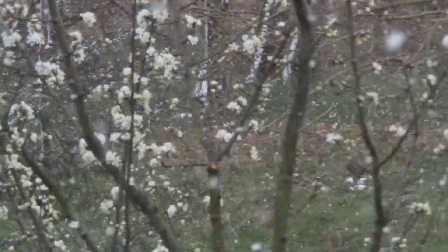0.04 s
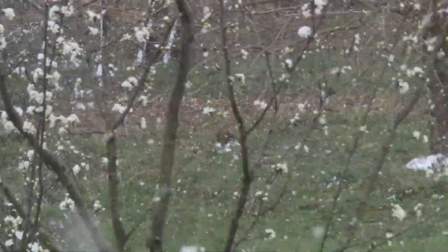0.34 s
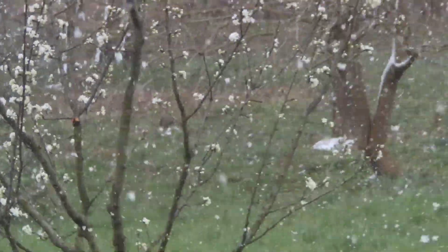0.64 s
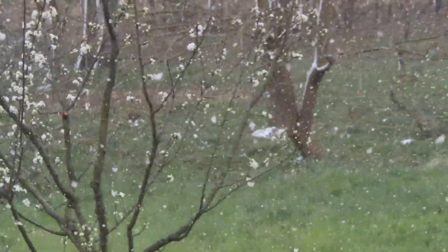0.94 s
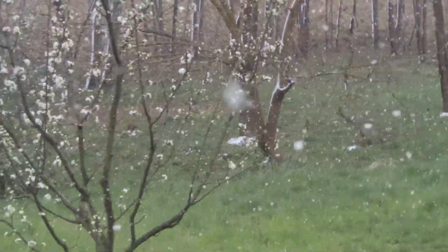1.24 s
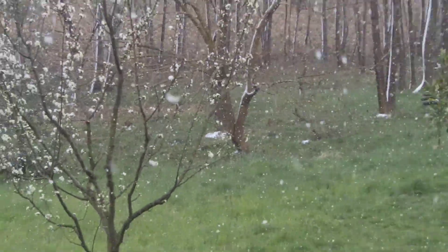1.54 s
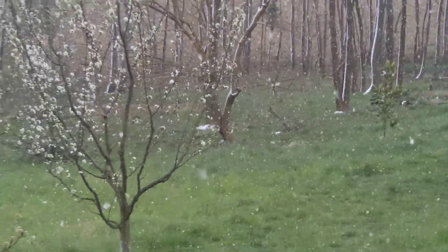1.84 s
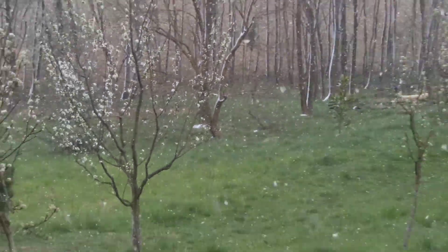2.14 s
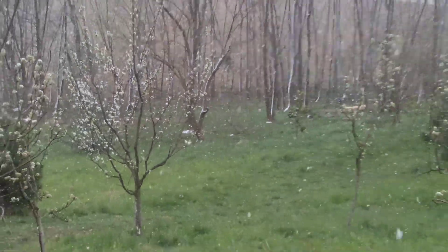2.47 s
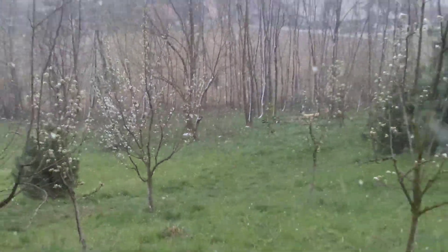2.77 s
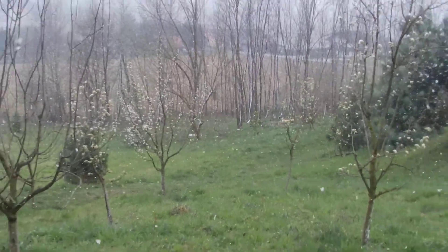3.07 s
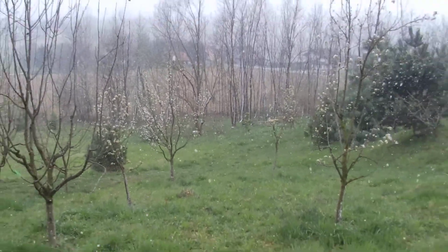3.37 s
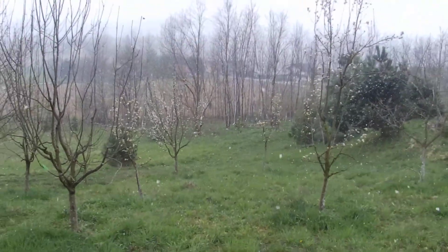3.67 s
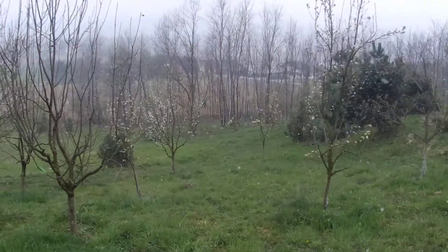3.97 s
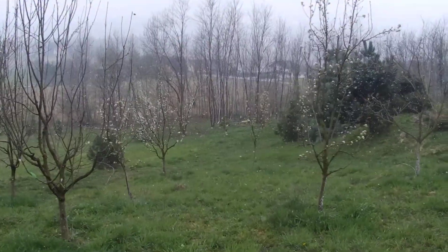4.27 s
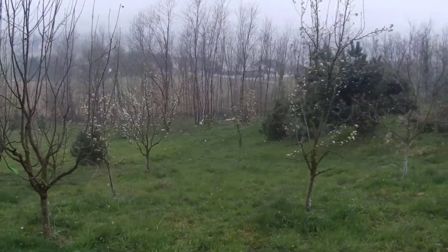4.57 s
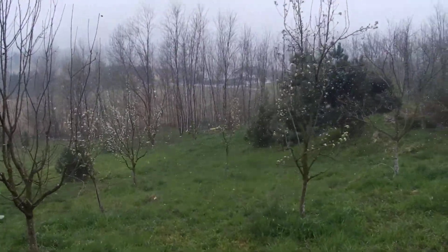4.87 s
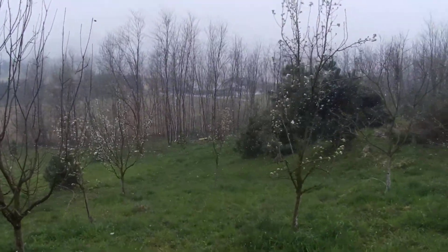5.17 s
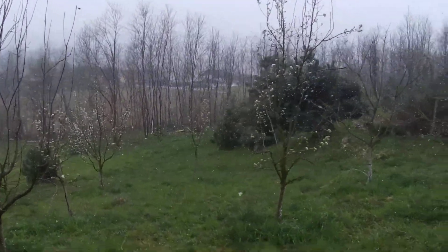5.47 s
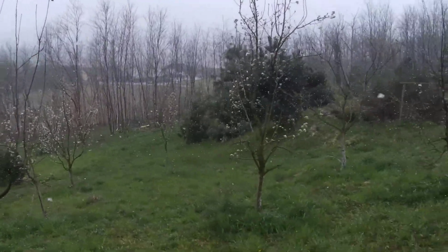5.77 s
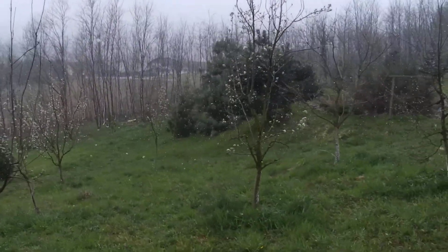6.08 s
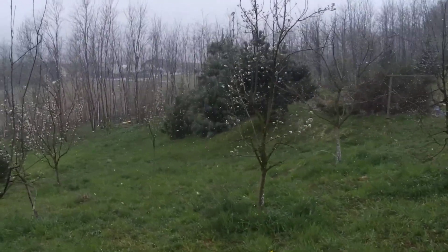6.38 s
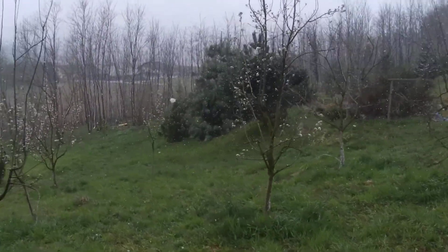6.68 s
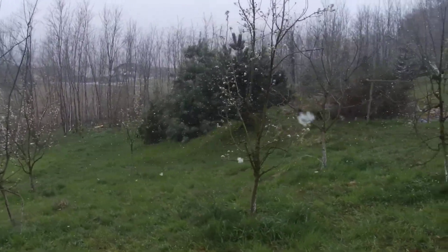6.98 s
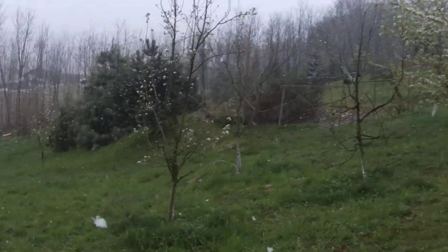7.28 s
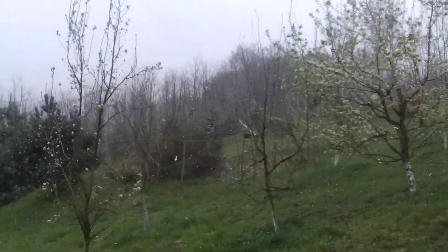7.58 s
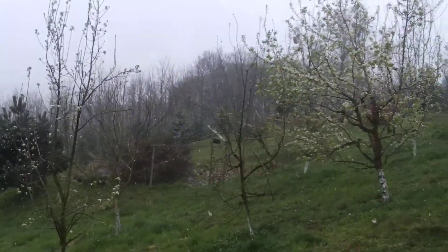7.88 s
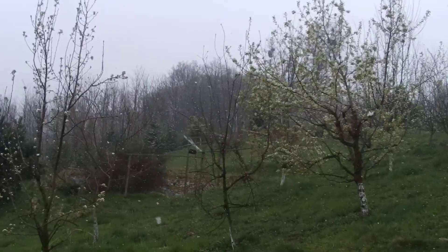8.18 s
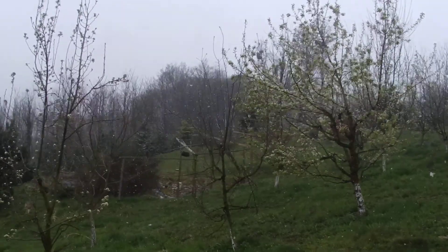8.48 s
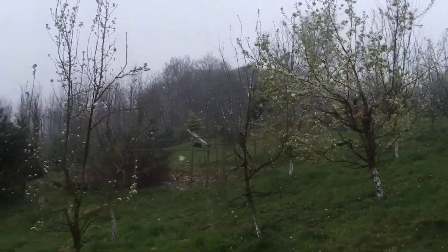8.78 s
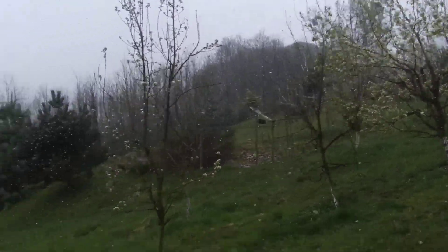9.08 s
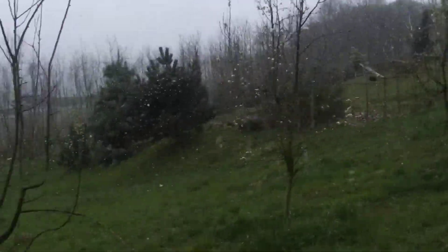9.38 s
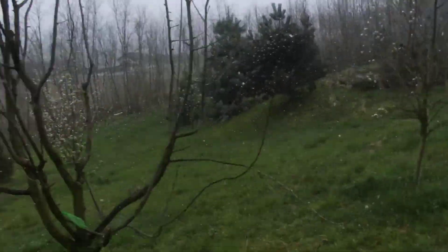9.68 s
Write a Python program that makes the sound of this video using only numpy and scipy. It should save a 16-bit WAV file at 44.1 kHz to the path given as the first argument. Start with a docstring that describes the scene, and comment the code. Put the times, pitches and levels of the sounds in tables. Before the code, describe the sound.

Faint distant air, a low wind rumble and a thin electronic hiss run throughout, heard through a hand-held camera's microphone in an orchard. From the start, the zoom motor whirs quietly with a fine gear rattle and a thin high whine. Small sharp lens ticks cluster between about 1.3 and 2.8 seconds, while fingers softly rub and bump the housing. At about 3.8 seconds the zoom stops, the hiss comes up and a gust buffets the microphone with low, irregular thumping puffs, by far the loudest sound. It dies down at around 5.2 seconds, leaving a weak rumble. From about 4 seconds to the end, sleeves rustle faintly and the plastic housing gives scattered light clicks. A soft, dull finger knock comes near 7.7 seconds, and several more between 8.6 and 9.4 seconds.

```python
"""A hand-held camera in an orchard on a raw spring day. Far air, a low wind rumble and a faint electronic
hiss are there from the start. For 3.8 seconds the zoom motor whirs and the lens ticks, while fingers rub
and knock on the housing. As the zoom ends, the hiss comes up, sleeves start to rustle and a gust buffets
the microphone. The gust dies down after about 5 seconds, leaving the sleeves rustling and the housing
clicking under the fingers as the camera pans."""
import sys
import numpy as np
from scipy import signal
from scipy.fft import rfft, irfft, next_fast_len
from scipy.io import wavfile
from scipy.ndimage import uniform_filter1d

SR = 44100
rng = np.random.default_rng(int(sys.argv[2]) if len(sys.argv) > 2 else 0)


def dump_mix(stems):
    """Bounce the given channels to the path in sys.argv[1] as a 16-bit WAV at rate SR."""
    frames = np.atleast_2d(stems).T  # one column per channel
    limited = np.clip(frames, -1, 1)  # hard clip at full scale
    pcm = np.round(limited * 32767).astype(np.int16)
    wavfile.write(sys.argv[1], SR, pcm)


N = 428652
TIME = np.arange(N) / SR
ZOOM_END_S = 3.8

# Levels in the tables are relative: the functions turn each layer up or down as a whole.
# The tone of far air, microphone hiss and wind rumble. Each row: frequency in Hz, level in dB.
AIR_TONE = [(60, -2), (130, 0.5), (250, -0.5), (450, -2), (650, -6), (1000, -9), (1500, -12), (2000, -21.5),
            (2600, -19), (4000, -34), (6000, -27.5), (8000, -56)]
HISS_TONE = [(2000, 2), (5500, -2.5), (7000, -10), (8300, -12), (10000, -7), (12000, -2.5), (14000, 0),
             (15800, -5)]
RUMBLE_TONE = [(12, -8), (25, -7.5), (48, 0.5), (80, -1.5), (130, -7.5), (220, -18), (400, -30), (900, -84)]
# How hard the wind presses on the microphone. Each row: time in seconds, level in dB.
WIND_STRENGTH = [(0, -51.5), (1.5, -53), (2.4, -51.5), (2.9, -43), (3.2, -46), (3.6, -44), (3.92, -32),
                 (4.88, -29.5), (5.3, -49), (5.65, -44.5), (5.85, -50), (6.7, -48), (8.4, -52.5),
                 (9.25, -48), (9.5, -42.5), (9.72, -48)]
# How hard the zoom drive works. Each row: time in seconds, level in dB.
ZOOM_LOAD = [(0, -57.5), (.9, -57), (1.22, -54.5), (1.5, -58.5), (2.62, -56), (2.77, -53), (2.92, -60),
             (3.8, -59)]
# Where the gear housing and the lens barrel ring. Each row: pitch in Hz, base width in Hz, level in dB.
GEAR_RINGS = [(254, 41, 4.5), (437, 98, 1.5), (678, 170, -3), (942, 143, 4.5), (1127, 76, -0.5),
              (1390, 130, -7.5), (1575, 50, -4)]
BARREL_RINGS = [(2770, 290, -0.5), (3375, 250, 1.5), (3790, 570, -4), (4420, 490, -4), (5200, 680, -9.5)]
# A thin high whine near 12 kHz, with two fainter bands of hiss below it during the zoom.
# Each row: pitch in Hz, width in Hz, level in dB.
WHINE_AND_HISS_BANDS = [(9400, 620, -91), (11030, 450, -86), (12040, 480, -76)]
# Sharp ticks of the lens. Each row: time in seconds, tick level in dB, barrel ring level in dB.
LENS_CATCHES = [(0.19, -53, -55), (0.2059, -49, -45), (0.655, -52, -40), (1.17, -59, -39.5),
                (1.3349, -47, -59), (1.3668, -52, -62), (1.627, -39, -58), (1.7472, -46.5, -60),
                (1.8446, -45, -57), (1.915, -38.5, -54), (1.9774, -46, -50), (2.0068, -45, -57),
                (2.271, -63, -43), (2.301, -48, -57), (2.384, -36, -51), (2.394, -42, -51),
                (2.4314, -45, -61), (2.7835, -50, -56), (2.8205, -37, -54)]
# The tone of a lens tick. Each row: frequency in Hz, level in dB.
TICK_TONE = [(1500, -22), (3500, -1), (5500, -3.5), (8000, -22), (9500, -8), (11000, -6), (12200, 2),
             (14000, 4), (15800, -1)]
# Soft rubs of the hand. Each row: middle in seconds, length in seconds, level in dB, pitch in Hz.
HAND_RUBS = [(.2, 0.52, -56, 392), (0.67, 0.15, -51.5, 180), (0.907, 0.16, -52.5, 188),
             (1.2, 0.19, -51.5, 120), (2.396, 0.015, -44, 262), (3.255, .15, -53, 263),
             (3.454, 0.15, -48, 128), (6.18, 0.068, -51.5, 165), (6.864, 0.15, -55, 190),
             (6.847, 0.56, -59, 1050), (7.513, 0.13, -53, 443), (8.044, 0.29, -57.5, 450),
             (9.197, 0.54, -59, 424), (9.558, 0.2, -56, 272)]
# Dull knocks of the fingers. Each row: time in seconds, level in dB.
FINGER_KNOCKS = [(2.384, -50), (2.78, -42), (7.723, -46.5), (8.627, -44), (9.098, -43.5), (9.231, -44.5),
                 (9.365, -39)]
# The tone of a knock. Each row: frequency in Hz, level in dB.
KNOCK_TONE = [(100, 7), (400, 27), (1500, 13), (6000, -11), (12000, -11)]
# Strokes of the sleeve. Each row: start in seconds, length in seconds, level in dB.
SLEEVE_STROKES = [(3.8, .17, -62), (4.42, 0.19, -60), (4.86, 0.085, -54.5), (5.8, 0.34, -64.5),
                  (6.62, 0.041, -56.5), (6.78, 0.34, -63), (7.42, 0.13, -57.5), (7.8, 0.046, -58),
                  (8.02, 0.14, -58.5), (8.95, .13, -59.5), (9.46, 0.24, -58)]
# Crisp crumples of the fabric. Each row: middle in seconds, length in seconds, level in dB.
SLEEVE_CRUMPLES = [(3.88, 0.071, -60.5), (3.984, 0.059, -59.5), (4.756, 0.14, -60.5), (4.902, 0.068, -53),
                   (5.07, 0.039, -57.5), (5.806, 0.08, -55), (5.957, 0.06, -53), (6.618, 0.019, -63),
                   (6.673, 0.025, -56), (8.987, 0.13, -59), (9.365, 0.044, -59.5)]
# The tone of sliding and of crumpling cloth. Each row: frequency in Hz, level in dB.
CLOTH_TONE = [(700, 0.5), (1800, -7), (2550, 1), (3400, -0.5), (4400, -2.5), (5700, -7.5), (7000, -15),
              (8300, -19.5), (11000, -14), (14000, -26)]
CRUMPLE_TONE = [(1200, -11), (2500, -9), (3600, 3), (4500, 4.5), (5700, -2), (7000, -26), (8300, -21),
                (11000, -7.5), (14000, -19)]
# The puffs of the gust. Each row: start in seconds, length in seconds, level in dB.
GUST_PUFFS = [(3.8, 0.082, -36), (3.872, 0.056, -25), (3.968, 0.058, -24.5), (4.152, 0.051, -25.5),
              (4.255, 0.068, -25.5), (4.415, 0.16, -33.5), (4.62, 0.049, -23.5), (4.735, 0.17, -22),
              (5.003, 0.013, -28), (5.112, .01, -25.5), (5.182, 0.032, -27.5), (5.58, .125, -43)]
# Single strong swirls of air. Each row: time in seconds, level in dB, pitch in Hz.
BIG_SWIRLS = [(3.896, -13, 121), (3.915, -19, 250), (3.968, -12.5, 163), (3.997, -10, 230),
              (4.015, -22, 118), (4.158, -14, 193), (4.206, -10.5, 162), (4.245, -15.5, 119),
              (4.282, -17, 124), (4.346, -22.5, 204), (4.415, -11.5, 162), (4.43, -11.5, 149),
              (4.512, -9, 153), (4.621, -11, 217), (4.655, -15, 161), (4.795, -13, 123),
              (4.835, -14.5, 120), (4.909, -17, 137), (5.116, -17, 169), (5.185, -21.5, 142),
              (5.694, -26, 173), (6.551, -28.5, 143), (8.997, -34.5, 162)]
# Clicks of the housing. Each row: time in seconds, level in dB, pitch in Hz, shell ring level in dB.
HOUSING_CLICKS = [(4.087, -45, 3640, -69), (4.6448, -47, 5200, -61), (4.864, -32.5, 3770, -59),
                  (4.9504, -50, 3970, -63), (5.004, -42, 4200, -65), (5.2165, -45.5, 4040, -57),
                  (5.775, -46, 4200, -60), (5.839, -41, 4630, -62), (5.9202, -41, 3940, -61),
                  (6.027, -38, 4130, -64), (6.423, -43, 3300, -62), (6.6118, -40, 4330, -50),
                  (6.666, -50, 4640, -65), (6.752, -47, 3880, -56), (7.3974, -36.5, 4800, -55),
                  (7.4393, -43, 4050, -55), (7.665, -47, 2900, -65), (8.1554, -52, 3160, -65),
                  (8.6273, -47, 3260, -55), (9.0987, -42, 3140, -44), (9.1357, -56, 2920, -49),
                  (9.2274, -48, 3860, -64), (9.362, -55, 4600, -56), (9.509, -52, 4370, -50.5),
                  (9.648, -45, 4700, -53)]


def from_db(db):
    """Turn decibels into a number to multiply by."""
    return 10 ** (np.asarray(db) / 20)


def rms_one(x):
    """Scale a sound so that its average strength (rms) is 1."""
    return x / np.sqrt(np.mean(x ** 2) + 1e-20)


def in_time(rows):
    """Join (time, value) rows with straight lines."""
    return np.interp(TIME, *np.transpose(rows))


def drift(per_s):
    """A random wander, about 1 in size, that heads for a new value per_s times a second."""
    points = rng.standard_normal(4096)
    return np.interp(TIME * per_s, np.arange(len(points)), points) * np.sqrt(3 / 2)


def held(start_s, length_s, rise_s, fall_s):
    """A loudness curve that rises to 1 at start_s, holds and dies away."""
    early = np.maximum(start_s - TIME, 0)
    late = np.maximum(TIME - start_s - length_s, 0)
    return np.exp(-np.minimum(early / rise_s + late / fall_s, 20))


def bursts(rows, rise_s, fall_s):
    """One loudness curve from (start, length, level) rows, adding their power."""
    return np.sqrt(sum((from_db(db) * held(s, length, rise_s, fall_s)) ** 2 for s, length, db in rows))


def evened(x, seconds):
    """Keep the fast grain of a sound but hold its slow level at 1."""
    size = int(seconds * SR)
    power = uniform_filter1d(uniform_filter1d(x * x, size), size)
    return x / np.sqrt(np.abs(power) + 1e-12)


def coloured(x, tone):
    """Filter a sound so that it follows a tone table."""
    size = next_fast_len(N + SR // 4, real=True)
    hz, db = np.transpose(tone)
    grid_hz = np.maximum(np.fft.rfftfreq(size, 1 / SR), 1)
    gain = from_db(np.interp(np.log(grid_hz), np.log(hz), db))
    cepstrum = irfft(np.log(gain), size)
    # Fold it onto its first half, so the filter rings only after a hit (minimum phase).
    cepstrum[1:size // 2] *= 2
    cepstrum[size // 2 + 1:] = 0
    return irfft(rfft(x, size) * np.exp(rfft(cepstrum)), size)[:N]


def low_pass(x, hz):
    """Take away the treble above hz."""
    return signal.sosfilt(signal.butter(4, hz, fs=SR, output="sos"), x)


def resonate(x, hz, width_hz):
    """Let a sound ring at one pitch, which passes at full strength."""
    r = np.exp(-np.pi * width_hz / SR)
    feedback = [1, -2 * r * np.cos(2 * np.pi * hz / SR), r * r]
    return signal.lfilter(np.array([1, 0, -1]) * (1 - r * r) / 2, feedback, x + 1e-18)


def narrow(x, hz, width_hz):
    """Ring twice over, so that little is left away from the pitch."""
    return resonate(resonate(x, hz, width_hz), hz, width_hz)


def noise(tone):
    """Smooth noise with the given tone, at strength 1."""
    return rms_one(coloured(rng.standard_normal(N), tone))


def grains(per_s, spread_db):
    """Tiny random taps of uneven size, at strength 1."""
    chance, out = rng.random(N), np.zeros(N)
    taps = np.flatnonzero(chance < per_s / SR)
    rarity = np.minimum(-np.log(chance[taps] * SR / per_s + 1e-12), 4)   # big taps are rare
    out[taps] = from_db(spread_db * rarity) * (-1) ** taps
    return rms_one(out)


def rattle(rings, per_s, spread_db):
    """A rattling part: each of its pitches is set ringing by its own stream of tiny taps."""
    return rms_one(sum(from_db(db) * narrow(grains(per_s, spread_db), hz, 1.8 * width)
                       for hz, width, db in rings))


def add(out, s, sound):
    """Mix a short sound in at s seconds."""
    start = int(np.clip(s * SR, 0, N - 1))
    out[start:start + len(sound)] += sound[:N - start]


def swell(sound, middle_s, length_s, db):
    """Fade a sound in and out along a bell shape."""
    distance = (TIME - middle_s) / length_s
    return from_db(db) * np.exp(-2 * distance ** 2) * (np.abs(distance) < 2) * sound


def snap(decay_s, tail_db, tail_s):
    """Two things touch: a very short burst of noise with a longer tail."""
    t = TIME[:SR // 25]
    envelope = np.exp(-t / decay_s) + from_db(tail_db) * np.exp(-t / tail_s)
    return rng.standard_normal(len(t)) * envelope


def strikes(rows, decay_s, tail_db, tail_s):
    """One snap for each (time, level) row."""
    out = np.zeros(N)
    for s, db in rows:
        contact = snap(decay_s, tail_db, tail_s)
        add(out, s, from_db(db) * contact / np.abs(contact).max())
    return out


def air_and_hiss(air_db=-51.5, hiss_db=-62.5, return_s=0.27):
    """Far air over fields and trees, and the microphone's own hiss; both come up as the zoom ends."""
    zooming = np.clip((ZOOM_END_S - TIME) / return_s, 0, 1)
    dip = held(start_s=3, length_s=0.62, rise_s=0.12, fall_s=0.12)   # the air goes briefly quieter
    air = from_db(air_db - 2 * zooming - 12.5 * dip) * noise(AIR_TONE)
    hiss = from_db(hiss_db - 13.5 * zooming) * noise(HISS_TONE)
    return air + hiss


def wind_rumble(gain_db=-1, waver_db=1.5):
    """Slow swings of wind pressure push on the microphone all along."""
    level_db = in_time(WIND_STRENGTH) + gain_db + waver_db * drift(per_s=7)
    return from_db(level_db) * evened(noise(RUMBLE_TONE), seconds=0.21)


def zoom_motor(white, hold_s=0.73, fade_db_per_s=3.5):
    """The motor thrums low and sings a thin note that holds, then fades."""
    thrum = from_db(-53) * rms_one(narrow(white, hz=40.9, width_hz=21))
    singing_db = -66.5 - fade_db_per_s * np.maximum(TIME - hold_s, 0)
    return thrum + from_db(singing_db) * rms_one(narrow(white, hz=3706, width_hz=440))


def high_whine(white):
    """A thin high whine near 12 kHz, with two fainter bands of hiss below it."""
    return sum(from_db(db) * rms_one(narrow(white, hz, width)) for hz, width, db in WHINE_AND_HISS_BANDS)


def zoom_drive(travel_s=1.41, travel_length_s=1.57):
    """While the motor runs, gear teeth rattle the housing and the barrel slides and ticks."""
    load_db = in_time(ZOOM_LOAD)
    # A second lens group travels for part of the zoom, adding to the scraping and ticking.
    travel = held(travel_s, travel_length_s, rise_s=0.06, fall_s=0.06)
    arrived = (1 - travel) * (TIME > travel_s + travel_length_s)
    slide_db = load_db - 11 + 2.5 * travel - arrived
    ticking_db = load_db - 13.5 + 5 * travel
    gears = from_db(load_db + 4) * rattle(GEAR_RINGS, per_s=3000, spread_db=2)
    barrel = from_db(slide_db + 1.2 * drift(40)) * rattle(BARREL_RINGS, per_s=2200, spread_db=6.5)
    taps = grains(per_s=6000, spread_db=5.5) * from_db(1.9 * drift(70))
    ticking = from_db(ticking_db) * rms_one(coloured(taps, TICK_TONE))
    white = rng.standard_normal(N)
    running = np.clip((ZOOM_END_S - TIME) / 0.024 + 1, 0, 1)
    return running * (gears + barrel + ticking + zoom_motor(white) + high_whine(white))


def lens_ticks(tick_gain_db=5, ring_gain_db=17):
    """The lens group catches and lets go with bright ticks that ring the barrel."""
    rows = np.array(LENS_CATCHES)
    ticks = strikes(rows[:, [0, 1]], decay_s=0.00085, tail_db=9, tail_s=0.0049)
    blows = strikes(rows[:, [0, 2]], decay_s=0.00071, tail_db=9, tail_s=0.0058)
    ring = resonate(blows, hz=3590, width_hz=240)
    return from_db(tick_gain_db) * coloured(ticks, TICK_TONE) + from_db(ring_gain_db) * ring


def grip_rubs():
    """The hand rubs softly on the housing as its grip shifts."""
    friction = rng.standard_normal(N)
    return sum(swell(rms_one(narrow(friction, hz, 0.4 * hz)), s, length, db)
               for s, length, db, hz in HAND_RUBS)


def finger_knocks(gain_db=5):
    """Fingers bump the housing with dull knocks."""
    bumps = strikes(FINGER_KNOCKS, decay_s=0.0013, tail_db=-8, tail_s=0.0094)
    return from_db(gain_db) * coloured(bumps, KNOCK_TONE)


def end_stop():
    """The lens scrapes into its end stop."""
    scrape = rms_one(narrow(grains(per_s=2700, spread_db=3), hz=3270, width_hz=1300))
    return swell(scrape, middle_s=3.6, length_s=0.074, db=-61)


def sleeve(start_s=3.68, rest_db=-65.5):
    """Fibres slip softly with each stroke of the arm; folds give way in short crisp bursts."""
    begun = np.clip((TIME - start_s) / 0.06, 0, 1)
    strokes = bursts(SLEEVE_STROKES, rise_s=0.09, fall_s=0.14)
    motion = begun * np.hypot(strokes, from_db(rest_db))   # once moving, the arm never quite rests
    fibres = grains(per_s=5000, spread_db=4) * from_db(1.7 * drift(50))
    slips = rms_one(coloured(fibres, CLOTH_TONE))
    folds = evened(coloured(grains(per_s=1200, spread_db=5), CRUMPLE_TONE), seconds=0.047)
    return motion * slips + sum(swell(folds, s, length, db) for s, length, db in SLEEVE_CRUMPLES)


def gust(gain_db=-1, octaves_per_db=0.044, steepness=9.6):
    """Swirls of air tumble over the microphone: the harder the wind, the smaller and brighter they get."""
    # The churning between puffs moves 1.7 dB for each dB of wind.
    churn = from_db(-38 + 1.7 * (in_time(WIND_STRENGTH) + 32))
    puffs = bursts(GUST_PUFFS, rise_s=0.01, fall_s=0.018)
    force_db = 20 * np.log10(np.hypot(churn, puffs))
    lumps_db = 4.5 * drift(70)
    cutoff_hz = 285 * 2 ** (octaves_per_db * (force_db + lumps_db + 23))
    swirls = [grains(per_s=1100, spread_db=0.95) for _ in range(2)]
    roar = np.zeros(N)
    for k, hz in enumerate(95 * 2 ** (np.arange(7) / 2)):   # seven bands, half an octave apart
        band_filter = signal.butter(2, [hz / 2 ** 0.25, hz * 2 ** 0.25], "band", fs=SR, output="sos")
        band = signal.sosfilt(band_filter, swirls[k % 2] + 1e-18)
        roar += band / np.sqrt(1 + (hz / cutoff_hz) ** steepness)
    lumpy_roar = low_pass(roar, hz=850) * from_db(lumps_db)
    return from_db(force_db + gain_db) * evened(lumpy_roar, seconds=0.024)


def buffets(push_db=-3, damping=0.97, flutter_db=-25, flutter_s=0.0028):
    """A big swirl gives one push and a swing back, and breaks up into a brief brighter flutter."""
    out, t = np.zeros(N), TIME[:SR // 16]
    breakup = (t / flutter_s) ** 2 * np.exp(2 - 2 * t / flutter_s)
    for s, db, hz in BIG_SWIRLS:
        cycles = hz * t
        push = cycles ** 2 * np.exp(-np.pi * damping * cycles) * np.cos(2 * np.pi * cycles)
        flutter = breakup * rms_one(narrow(rng.standard_normal(len(t)), hz=452, width_hz=78))
        add(out, s, from_db(db + push_db) * push / np.abs(push).max())
        add(out, s, from_db(db + flutter_db) * flutter)
    return low_pass(out, hz=950)


def housing_clicks(click_gain_db=2, ring_gain_db=9, shell_hz=2580, shell_width_hz=180):
    """The housing clicks under the fingers, and its shell rings briefly."""
    out, t = np.zeros(N), TIME[:SR // 25]
    shell = np.exp(-np.pi * shell_width_hz * t) * np.sin(2 * np.pi * shell_hz * t)
    for s, db, hz, shell_db in HOUSING_CLICKS:
        contact = snap(decay_s=0.00097, tail_db=-18, tail_s=0.0067)
        click = narrow(contact, hz, hz / 2)   # a wide band, because plastic hardly rings
        add(out, s, from_db(db + click_gain_db) * click / np.abs(click).max())
        add(out, s, from_db(shell_db + ring_gain_db) * shell)
    return out


def scene():
    """Everything meets at one microphone."""
    background = air_and_hiss()
    wind = wind_rumble() + gust() + buffets()
    zoom = zoom_drive() + end_stop() + lens_ticks()
    handling = sleeve() + finger_knocks() + housing_clicks() + grip_rubs()
    return (background + wind + zoom + handling)[None, :]


def record(dry):
    """The highest treble, above 15850 Hz, is cut off steeply."""
    return signal.sosfilt(signal.ellip(12, 0.2, 80, 15850, fs=SR, output="sos"), dry)


dry = scene()
out = record(dry)
dump_mix(out)
```